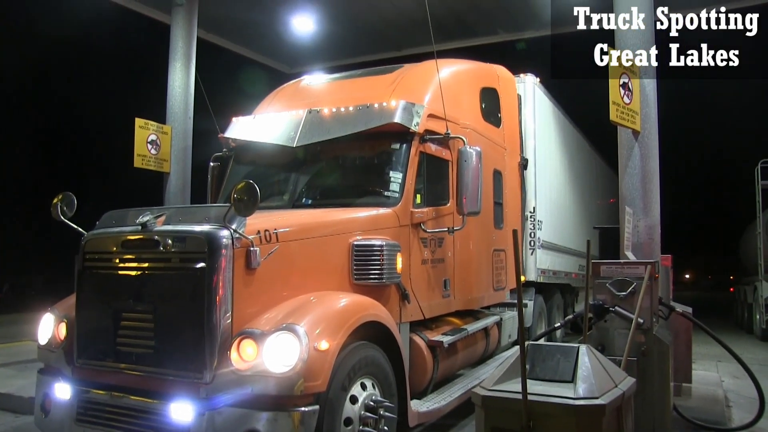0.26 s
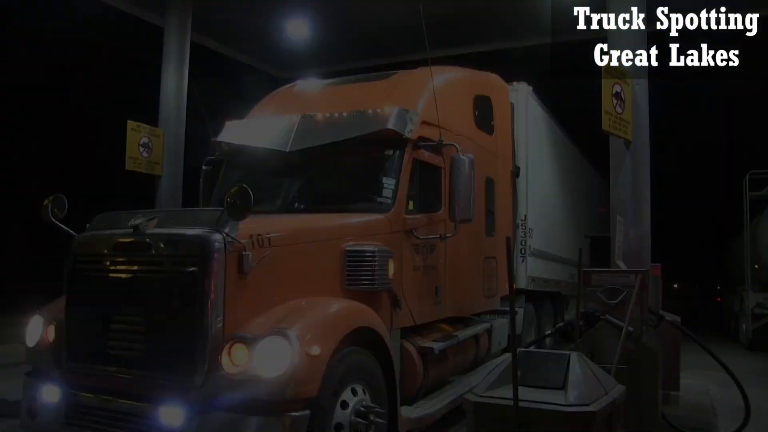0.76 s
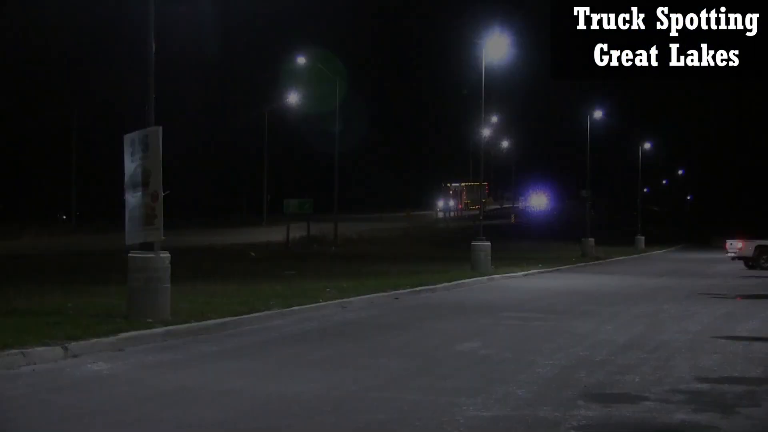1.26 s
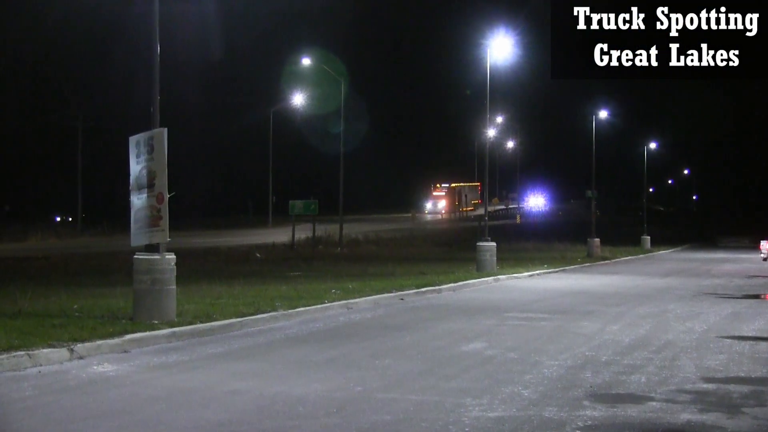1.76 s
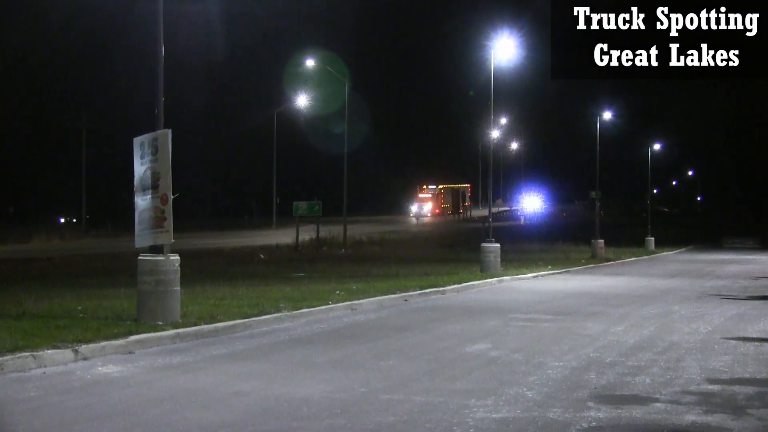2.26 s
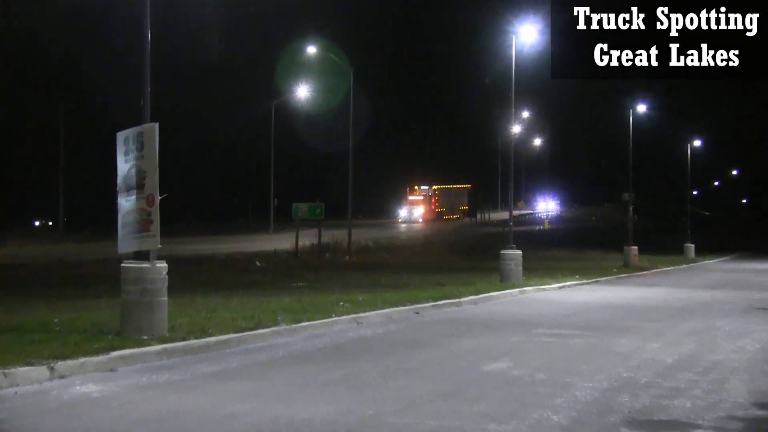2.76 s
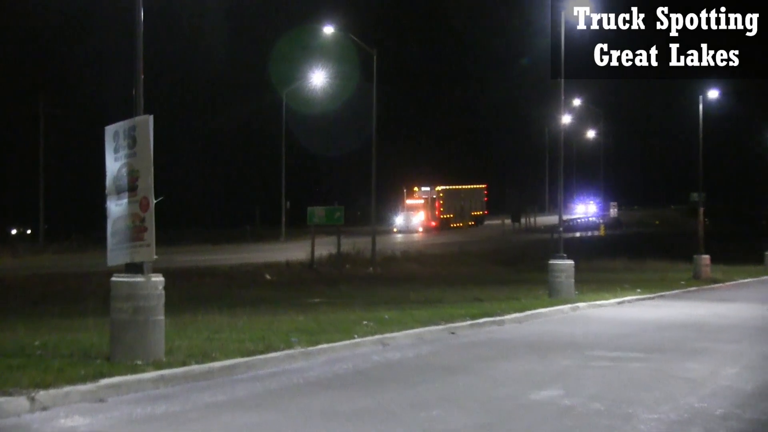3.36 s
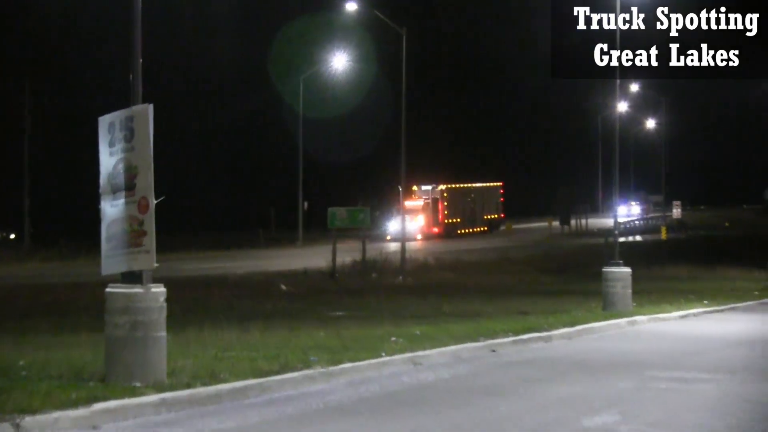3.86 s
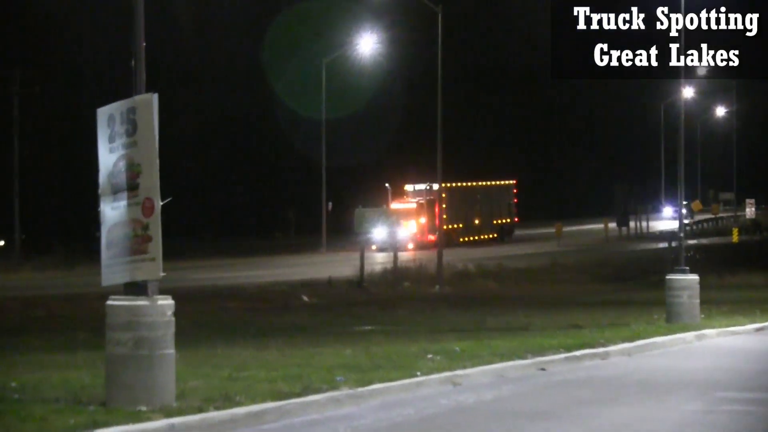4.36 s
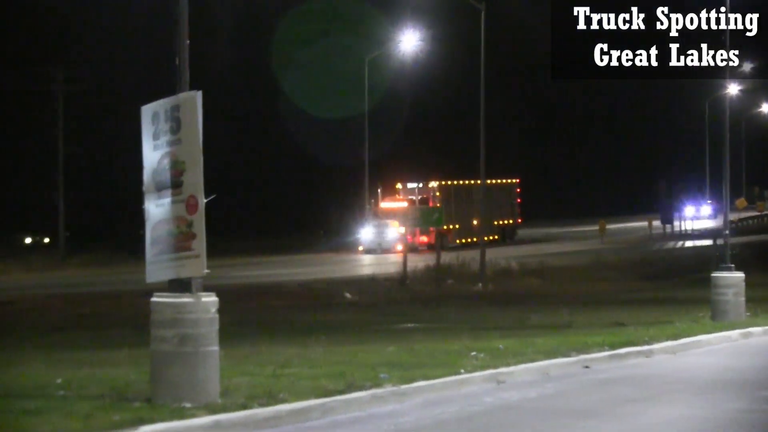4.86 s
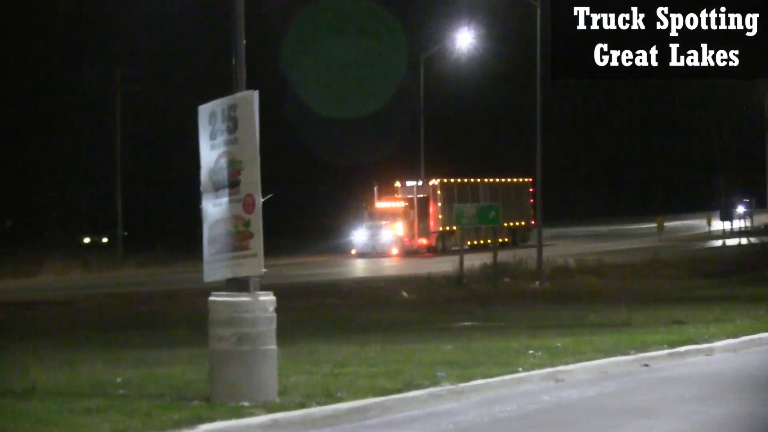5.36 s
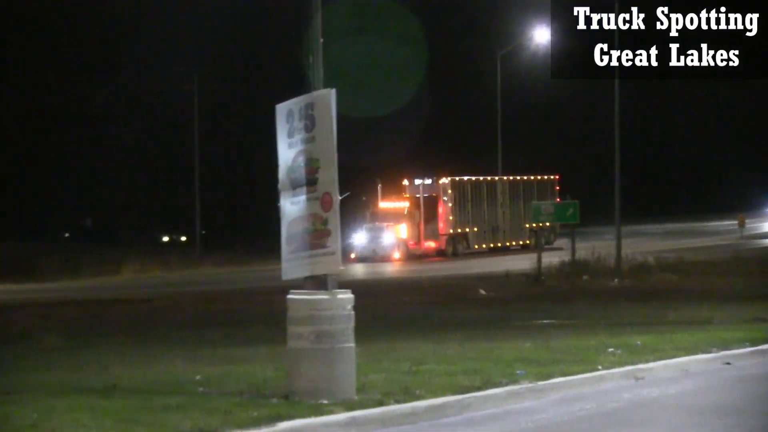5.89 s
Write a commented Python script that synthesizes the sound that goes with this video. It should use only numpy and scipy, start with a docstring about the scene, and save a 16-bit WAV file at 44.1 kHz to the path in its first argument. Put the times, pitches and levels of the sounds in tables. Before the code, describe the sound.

A diesel truck idles close by, then fades into a distant truck's barking engine brake, a sharp click, a brief lull, and deeper braking again.

```python
"""Idling truck, then a distant engine brake

A diesel truck idles close by at a fuel island: noise that pulses with each firing, plus narrow rings. It fades
into a distant truck slowing on its engine brake: boom from sine waves, cracks from ringing pulses. The brake
barks, lets go for a gear change and barks again at higher revs; a tone sounds in between. Behind it lie the
noise drone of the lot, a compressor hum and a puff of air; a short bark rings as the brake bites again. One
click is a sudden step."""
import sys
import numpy as np
from scipy import signal
from scipy.fft import rfft, irfft, next_fast_len
from scipy.io import wavfile
from scipy.ndimage import uniform_filter1d, minimum_filter1d

SR = 44100
rng = np.random.default_rng(int(sys.argv[2]) if len(sys.argv) > 2 else 0)


def to_linear_factor(level_db):
    """Convert decibel levels (scalar or array-like) to linear amplitude factors."""
    exponent = np.asarray(level_db, float) / 20
    return 10 ** exponent


def to_wav(s):
    """Save 16-bit WAV."""
    ch = np.atleast_2d(s).T  # columns
    pcm = np.round(np.clip(ch, -1, 1) * 32767)  # PCM
    wavfile.write(sys.argv[1], SR, pcm.astype(np.int16))


N = 270321
TIME = np.arange(N) / SR  # s
FADE_START_S, FADE_END_S = 0.6, 1.514  # the near truck fades into the far one

# Idling truck: cycles of six firings a second, and about when a loudest knock falls
IDLE_CYCLE_HZ, IDLE_FIRST_S = 5.37, .09
IDLE_ROAR_DB = -11.5
# Knock of each of the six cylinders, relative: level/dB
IDLE_CYLINDERS_DB = [2.5, -1.5, -3.2, -2, 2.2, -0.2]
# Part of the roar's power that pulses with the firings: f/Hz, share/0-1
KNOCK_SHARE = [(200, 0.08), (1200, 0.27), (3000, 0.4), (6000, 0.2)]
# Colour of the idle roar, relative: f/Hz, level/dB per Hz
IDLE_COLOUR = [(25, -33.5), (54, -39), (86, -14.5), (130, -3), (300, -2.5), (580, -5), (700, -6.5),
               (900, -9), (1050, -4), (1350, -0.5), (2000, -12.5), (3200, -19.5), (4200, -30.5),
               (7200, -40.5), (9500, -54), (16000, -101)]
# Rings and whines of the block and pumps: f/Hz, width/Hz, level/dB
BLOCK_RINGS = [(134.5, 29, -28), (290.7, 30, -27), (383.4, 65, -35.5), (490, 27, -37.5), (827.5, 9.9, -27),
               (1026, 36, -30), (1244, 18, -42), (1558, 17, -31.5), (2375, 8, -39)]

# Colour of the drone of the lot, relative: f/Hz, level/dB per Hz
LOT_COLOUR = [(25, -54.5), (45, -47), (75, -19), (120, -10.5), (170, -1.5), (220, -1.5), (372, -11.5),
              (520, -13), (800, -25), (1130, -16.5), (1400, -22.5), (2000, -27), (2300, -32), (3200, -40),
              (4700, -47), (7200, -53.5), (10000, -59.5), (16000, -91)]
# Course of the drone's loudness: t/s, level/dB
LOT_LEVEL = [(.5, -14), (1.6, -18), (2.3, -21.5), (2.5, -21.5), (3.2, -19.5), (3.6, -19), (4.5, -19),
             (6.13, -20)]
# Compressor hum: t/s, f/Hz, level/dB
HUM = [(.5, 488.3, -33), (2, 491.2, -29.5), (4.3, 487.7, -28), (5.4, 491, -32.5), (6.13, 484, -32.5)]
# Puff of air, then a short bark as the brake bites again: t/s, level/dB, f/Hz, width/Hz, half length/s
BURSTS = [(2.497, -36.5, 2285, 202, 0.11), (3.268, -25.5, 540, 118, 0.011)]
# How alike left and right are in the noise: f/Hz, likeness/0-1
LIKENESS = [(60, 1), (110, 0.98), (210, 1.0), (410, 1), (770, 0.51), (1450, 0.86), (2740, 0.29)]

# Braking truck, one list for each stretch of braking: t/s, engine cycles per second/Hz
SPEED = [
    [(0.7, 12.335), (1.135, 12.167), (1.57, 12.062)],
    [(1.575, 12.021), (1.987, 11.911), (2.4, 11.76)],
    [(3.22, 14.174), (3.948, 13.854), (4.675, 13.555), (5.039, 13.45), (5.402, 13.257), (6.13, 12.873)],
]
# Part of the cycle already run when each stretch begins: part/0-1
CYCLE_DONE = [.579, .092, 0]
# Row of the push and crack tables for each stretch: 0 before the gear change, 1 after
GEAR = [0, 0, 1]
# The truck rounds the bend:
# t/s, boom level/dB, crack level/dB, delay of second stack behind first/ms, boom tilt/dB per octave
BEND = [(0.699, -14.5, -34.5, 2.24, -6.5), (1.348, -12.5, -29.5, 2.1, -4), (1.9, -8, -31, 2.24, 0),
        (2.4, -11, -32.5, 2.6, 0.4), (3.298, -10.5, -38, 1.1, -5), (3.65, -9.5, -38, 0.83, -6.5),
        (3.95, -8, -35, 1.1, -1), (4.398, -8, -23, 1.27, -2), (4.999, -7, -24.5, 1.74, 1),
        (5.599, -9, -23.5, 1.98, 0.5), (6.13, -7.5, -25, 1.68, 1.5)]
# Six exhaust pushes a cycle, relative: [before, after the gear change][stack][push], level/dB
PUSH_DB = [
    [[-.9, 2.8, -7.1], [2.8, 2.2, -4.2]],
    [[0, 2.8, 2.3], [-2.5, 6, 6]],
]
FIRST_PUSH = .376  # place of the first exhaust push in the cycle (0-1)
# Boom of the exhaust pipes, relative: f/Hz, level/dB
PIPE = [(20, -49), (75, -20), (100, -28.5), (135, -14), (150, -28.5), (165, -8.5), (195, -7), (225, -4),
        (250, 0.5), (275, -11.5), (300, -5), (340, -12), (390, -21), (450, -37), (900, -58)]
# Valve releases and their echoes: place in the cycle/0-1
CRACK_AT = [.03, .087, .2, .253, .285, .445, .6, .76, .865, .915]
# Strength of those, relative, one row before and one after the gear change: level/dB
CRACK_DB = [
    [-5, 0, -3, -3, -7, -3, -11, -14, -4, -3],
    [-2, -3, 0, -1, -4, 0, -15, -14, -13, -10],
]
# Ring of the stack, relative: f/Hz, width/Hz, level/dB
STACK_RINGS = [(398, 120, 3), (630, 282, 4), (1036, 453, 6), (1820, 296, -1), (2880, 87, -10.5)]
LET_GO_S, RELEASE_S, RELEASE_DB = 2.246, .15, -14.5  # the brake lets go: the bark dies ever faster
BITE_S, ATTACK_S, ATTACK_DB = 3.248, .028, -25  # and bites again in the lower gear
# Unsteadiness of the orders (cycles), the extra around the bite, and how long that takes to settle
WAVER, WAVER_AT_BITE, SETTLE_S = 0.03, 0.046, 1
FLUTTER_DB = 2.07  # each order swells and sinks a little on the long path

# The click, a step in the wave: t/s, level/dB, settling time/s
CLICK = (1.5723, -3, .0012)
# Firing tone between gears: t/s, f/Hz, level/dB
COAST = [(2.3, 73.6, -31), (2.45, 71.3, -36), (2.63, 77.2, -25), (2.74, 86.8, -36.5), (3.0, 80.7, -42.5),
         (3.3, 88, -32)]
# Uneven microphone ports: f/Hz, left minus right/dB
PORTS = [(60, 0), (110, 2), (210, 0), (410, 2.5), (770, -2.5), (1450, -2.0), (2740, -2)]


def evened(x):
    """Scales a sound to an average (rms) level of 1."""
    return x / np.sqrt(np.mean(x ** 2) + 1e-20)


def read(points, hz):
    """Reads a table between its points, along log frequency."""
    f, value = np.transpose(points)
    return np.interp(np.log(hz + 1), np.log(f + 1), value)


def resonate(x, hz, width):
    """Rings at one pitch, like a struck body; the doubled pole makes the skirts steep."""
    pole = np.exp((2j * np.pi * hz - np.pi * width) / SR)
    return signal.lfilter([(1 - abs(pole)) ** 2], [1, -2 * pole, pole ** 2], x).real * 2


def drift(rate_hz, count):
    """Slow random wander: lines drawn between random points."""
    points = rng.standard_normal((count, 400))
    point_s = np.arange(400) / rate_hz
    return np.array([np.interp(TIME, point_s, row) for row in points])


def noise(spectrum, patchy_db, weight=1):
    """Two-channel noise from random short-time spectra with drifting louder and softer patches."""
    frames, hz = N // 256 + 5, np.fft.rfftfreq(1024, 1 / SR)
    a, b, c, d, patches = rng.standard_normal((frames, 513, 5)).T
    patches = uniform_filter1d(patches, size=10, axis=0)
    patches = evened(uniform_filter1d(patches, size=12, axis=1))
    same = np.clip(read(LIKENESS, hz), -1, 1)[:, None]
    left = a + 1j * b
    right = same * left + np.sqrt(1 - same ** 2) * (c + 1j * d)
    colour = to_linear_factor(read(spectrum, hz))
    colour = weight * colour / np.linalg.norm(colour)
    z = np.array([left, right]) * colour[:, None] * to_linear_factor(patchy_db * patches)
    return signal.istft(z, nperseg=1024, noverlap=768)[1][:, :N]


def idling():
    """Block roar, part of it pulsed by each firing, and narrow rings of the block and pumps."""
    share = np.clip(read(KNOCK_SHARE, np.fft.rfftfreq(1024, 1 / SR)), 0, 1)
    firing = 6 * IDLE_CYCLE_HZ * (TIME - IDLE_FIRST_S) + 0.036 * drift(rate_hz=28, count=1)[0]
    cylinder = np.floor(firing).astype(int) % 6
    strength = to_linear_factor(np.array(IDLE_CYLINDERS_DB)[cylinder])
    fading = np.exp(-(firing % 1) / 1.3)  # each knock dies away until the next
    pulse = evened(uniform_filter1d(strength * fading, size=90))
    even_roar = noise(IDLE_COLOUR, 1.0, np.sqrt(1 - share))
    knocks = pulse * noise(IDLE_COLOUR, 3.5, np.sqrt(share))
    drive = rng.standard_normal(N)
    rings = sum(to_linear_factor(db) * evened(resonate(drive, hz, width)) for hz, width, db in BLOCK_RINGS)
    return to_linear_factor(IDLE_ROAR_DB) * evened(even_roar + knocks) + rings


def tone(rows, waver):
    """A sine tone that follows its table, wavers a little in pitch and starts and ends softly."""
    s, hz, db = np.transpose(rows)
    turns = np.cumsum(np.interp(TIME, s, hz)) / SR + waver * drift(rate_hz=6, count=1)[0]
    level = to_linear_factor(np.interp(TIME, s, db, -90, -90))
    level = uniform_filter1d(level, size=900, mode="nearest")
    return np.sqrt(2) * level * np.sin(2 * np.pi * turns)


def bursts():
    """Short bursts of ringing noise that swell and die in a bell shape: a puff of air and the bark of the bite."""
    drive = rng.standard_normal(N)
    puffs = np.zeros(N)
    for s, db, hz, width, half in BURSTS:
        swell = np.exp(-((TIME - s) / half) ** 2)
        puffs += to_linear_factor(db) * swell * evened(resonate(drive, hz, width))
    return puffs


def lot():
    """Noise drone of parked trucks and the highway, a compressor hum, a puff of air and the bark of the bite."""
    swell_db = np.interp(TIME, *np.transpose(LOT_LEVEL)) + 0.71 * drift(rate_hz=5.4, count=1)[0]
    drone = to_linear_factor(swell_db) * evened(noise(LOT_COLOUR, 0.97))
    return drone + tone(HUM, 0.012) + bursts()


def causal(points, hz):
    """Complex gain of a table, with the phase of a filter that cannot sound before it is driven."""
    grid = np.arange(513) * 2.  # Hz
    log_gain = np.log(to_linear_factor(read(points, grid)))
    mirrored = np.r_[log_gain, log_gain[-2:0:-1]]
    phase = -signal.hilbert(mirrored).imag[:len(grid)]
    return np.exp(np.interp(hz, grid, log_gain) + 1j * np.interp(hz, grid, phase))


def ring_stack(hits):
    """Each release is a jolt, then a short hiss; both make the exhaust stack ring."""
    burst = np.exp(-np.arange(400) / SR / 0.0014)
    hiss = signal.oaconvolve(hits[None], burst[None] / np.linalg.norm(burst), axes=1)[:, :N]
    white = rng.standard_normal((N, 3)).T
    drive = hits + .45 * hiss * (white[0] + .25 * white[1:])  # mostly shared by left and right
    cracks = sum(to_linear_factor(db) * resonate(drive, hz, width) for hz, width, db in STACK_RINGS)
    return cracks * np.std(hits) / np.std(cracks)


def brake():
    """Each cycle repeats: a boom of clean engine orders and sharp cracks as the valves dump their air."""
    boom, hits = np.zeros(N), np.zeros(N)
    k = np.arange(6, 32)[:, None]  # engine orders: waves per cycle
    wobble = drift(rate_hz=5, count=len(k) * 2)
    # six even pushes, three through each stack
    spacing = np.exp(-2j * np.pi * k[:, :, None] * np.arange(6).reshape(2, 3) / 6)
    s, boom_db, crack_db, behind_ms, tilt_db = np.transpose(BEND)
    release_db = RELEASE_DB * (np.maximum(TIME - LET_GO_S, 0) / RELEASE_S) ** 2
    attack_db = ATTACK_DB * np.maximum(BITE_S - TIME, 0) / ATTACK_S
    grip_db = np.where(TIME < (LET_GO_S + BITE_S) / 2, release_db, attack_db)
    settling = np.exp(-((TIME - BITE_S) / SETTLE_S) ** 2) * (TIME > LET_GO_S)
    waver = WAVER + WAVER_AT_BITE * settling
    for speed, done, gear in zip(SPEED, CYCLE_DONE, GEAR):
        stacks = (to_linear_factor(PUSH_DB[gear]) * spacing).sum(axis=2)
        on = (TIME > speed[0][0]) & (TIME < speed[-1][0])
        t = TIME[on]
        cycle_hz = np.interp(t, *np.transpose(speed))
        turns = np.cumsum(cycle_hz) / SR + done
        # the two stacks add or cancel, order by order, as their gap in arrival changes
        gap = np.exp(1j * np.pi * k * cycle_hz * np.interp(t, s, behind_ms) / 1000)
        orders = causal(PIPE, k * cycle_hz) * (stacks[:, :1] * gap + stacks[:, 1:] / gap)
        orders *= to_linear_factor(np.interp(t, s, tilt_db) * np.log2(k))
        orders /= np.linalg.norm(orders, axis=0)
        angle = 2 * np.pi * (k * (turns - FIRST_PUSH) + waver[on] * wobble[1::2, on])
        flutter = to_linear_factor(FLUTTER_DB * wobble[::2, on])
        tones = np.sqrt(2) * flutter * (orders * np.exp(1j * angle)).real
        soft_end = np.minimum((t[-1] - t) / .003, 1)
        boom[on] = to_linear_factor(np.interp(t, s, boom_db)) * tones.sum(0) * soft_end
        train = np.zeros(len(t))
        for place, db in zip(CRACK_AT, CRACK_DB[gear]):
            at = np.flatnonzero(np.diff(np.floor(turns - place)))  # once a cycle
            uneven_db = 0.56 * rng.standard_normal(len(at))
            train[at] = to_linear_factor(db + uneven_db)
        hits[on] = to_linear_factor(np.interp(t, s, crack_db)) * evened(train)
    grip = to_linear_factor(grip_db)
    return grip * boom + ring_stack(grip * hits)


def click():
    """One click: the wave jumps down at once and settles back."""
    s, db, settle = CLICK
    return -to_linear_factor(db) * (TIME >= s) * np.exp(-np.maximum(TIME - s, 0) / settle)


def coasting():
    """The engine's firing tone, heard while the brake is off between gears."""
    return tone(COAST, .02)


def scene():
    """Crossfades from the near truck to the far one and its lot, and adds the click."""
    far = np.clip((TIME - FADE_START_S) / (FADE_END_S - FADE_START_S), 0, 1)
    return (1 - far) * idling() + far * (lot() + brake() + coasting()) + click()


def masked(x, depth_db):
    """Silences any part of the spectrum that lies too far under the loudness of the moment."""
    z = signal.stft(x, nperseg=2048)[2]
    power = abs(z) ** 2
    loud = np.sqrt(power.sum(1, keepdims=True))
    band = np.sqrt(abs(uniform_filter1d(power, size=9, axis=1)))
    return signal.istft(z * (band > loud / to_linear_factor(depth_db)), nperseg=2048)[1][:, :N]


def roll_off(x):
    """The treble ends steeply here."""
    return signal.sosfilt(signal.butter(12, 15700, fs=SR, output="sos"), x)


def record(dry):
    """Unequal microphone ports, a fast limiter on the peaks, and silencing of the faintest parts."""
    size = next_fast_len(N)
    lean_db = read(PORTS, np.fft.rfftfreq(size, 1 / SR))
    ports = to_linear_factor(np.outer([.5, -.5], lean_db))
    ported = irfft(rfft(dry, size) * ports, size)[:, :N]
    room = np.minimum(.96 / (abs(ported).max(0) + 1e-9), 1)  # gain that keeps peaks under .96
    limited = ported * uniform_filter1d(minimum_filter1d(room, size=161), size=81)
    mix = masked(limited, depth_db=63.5)
    return roll_off(mix)


dry = scene()
out = record(dry)
to_wav(out)
```